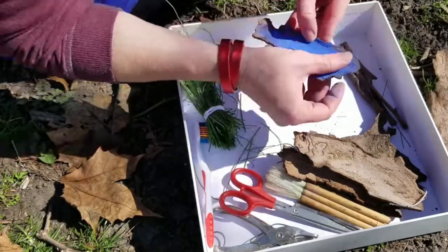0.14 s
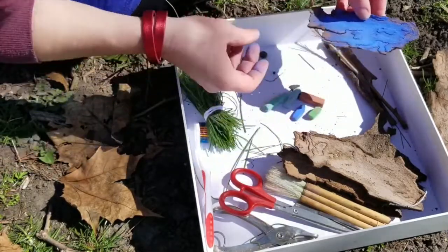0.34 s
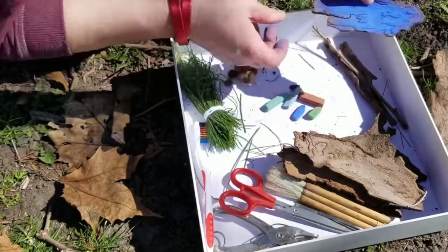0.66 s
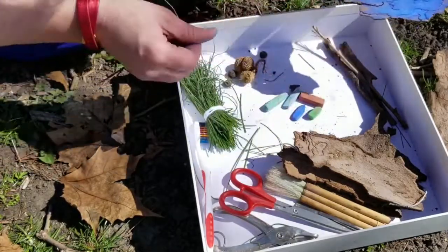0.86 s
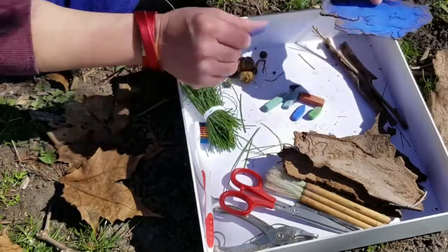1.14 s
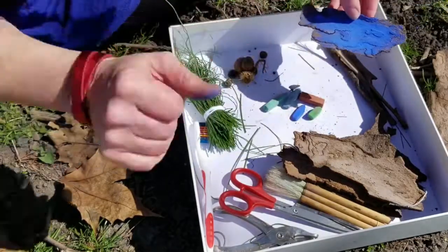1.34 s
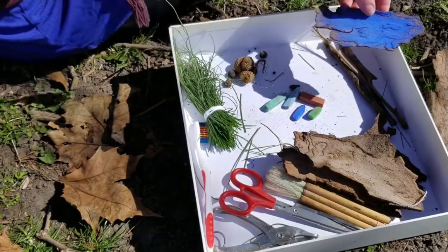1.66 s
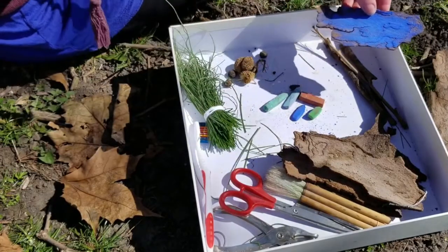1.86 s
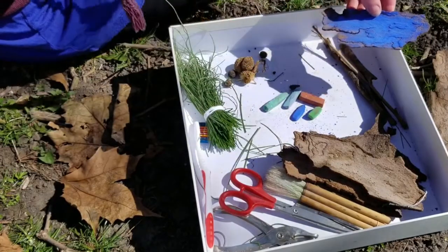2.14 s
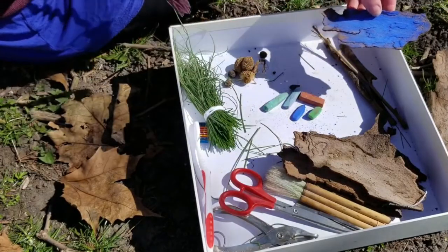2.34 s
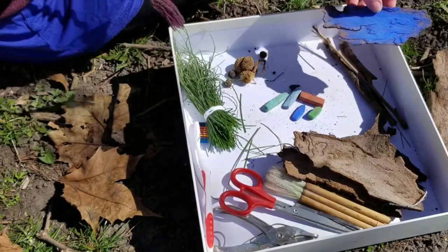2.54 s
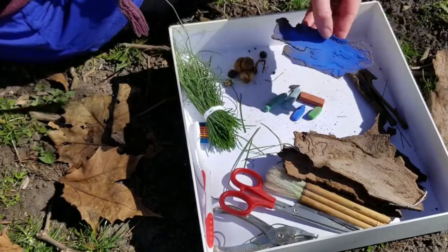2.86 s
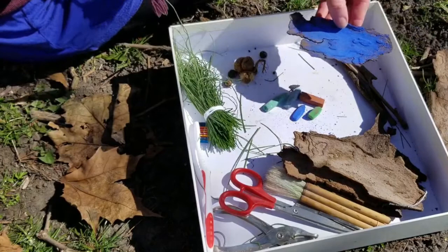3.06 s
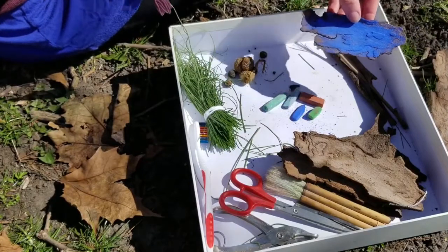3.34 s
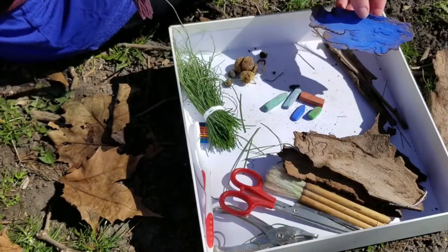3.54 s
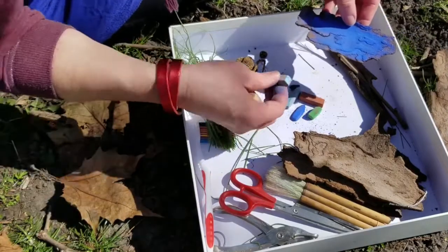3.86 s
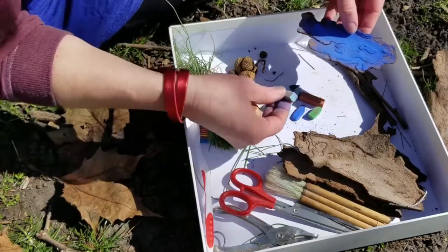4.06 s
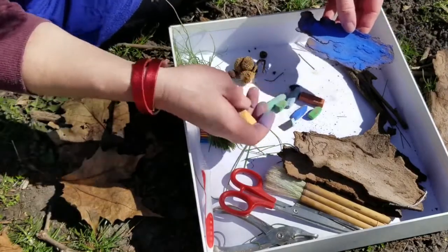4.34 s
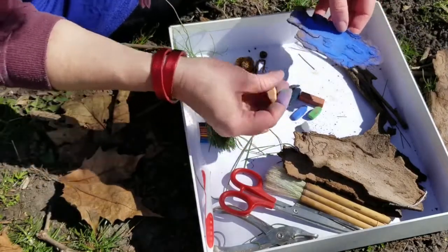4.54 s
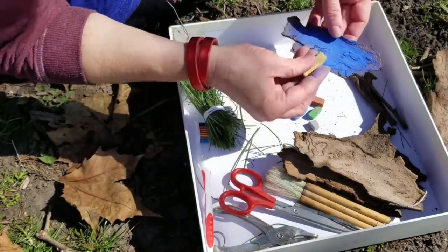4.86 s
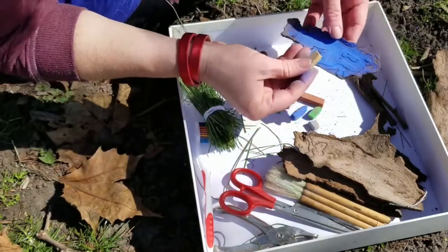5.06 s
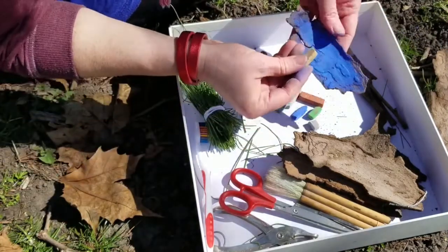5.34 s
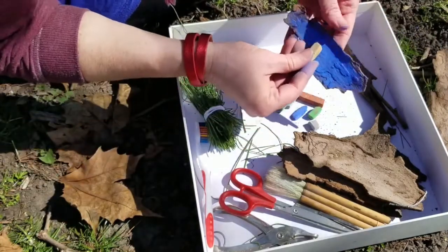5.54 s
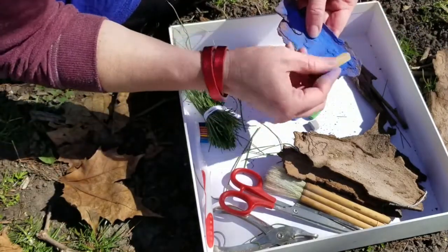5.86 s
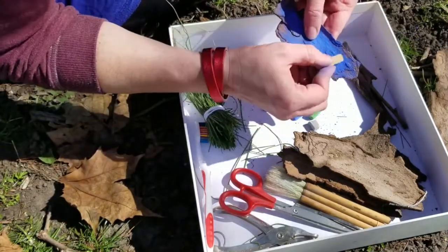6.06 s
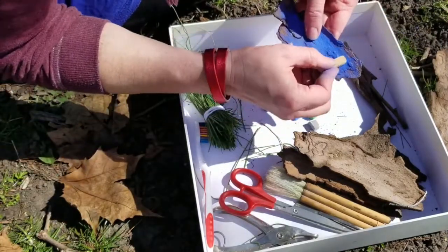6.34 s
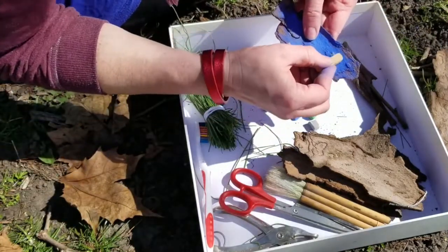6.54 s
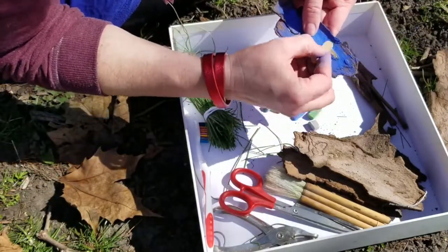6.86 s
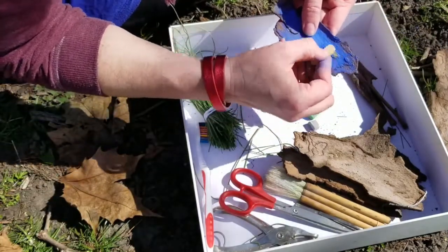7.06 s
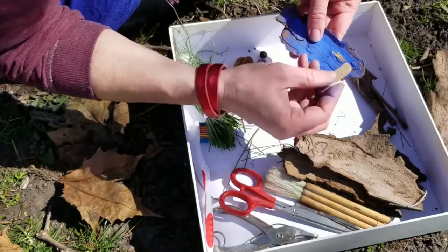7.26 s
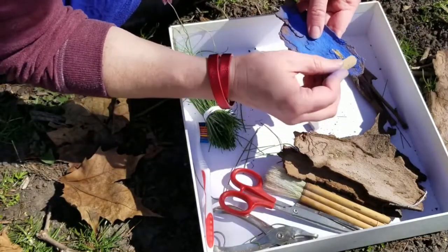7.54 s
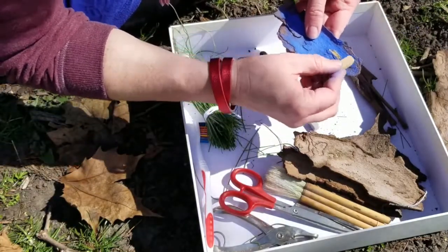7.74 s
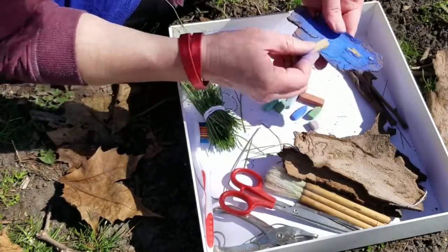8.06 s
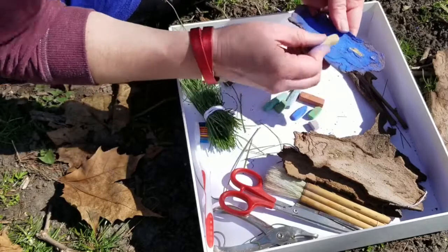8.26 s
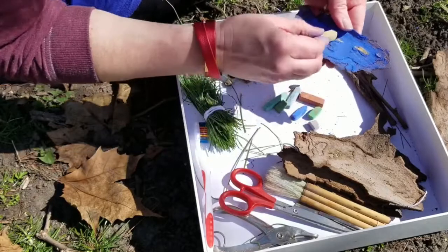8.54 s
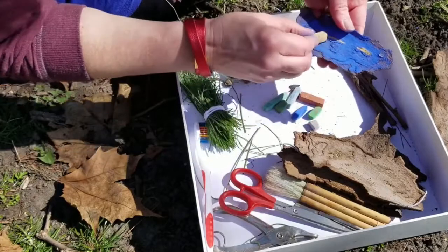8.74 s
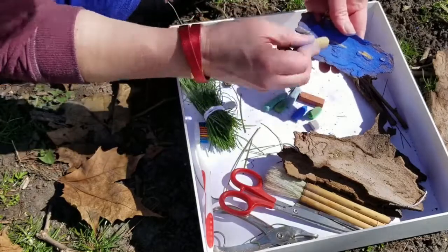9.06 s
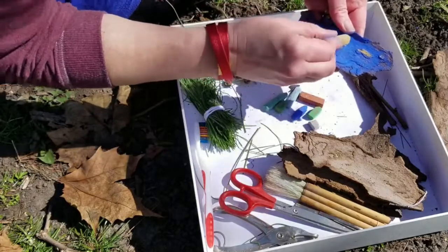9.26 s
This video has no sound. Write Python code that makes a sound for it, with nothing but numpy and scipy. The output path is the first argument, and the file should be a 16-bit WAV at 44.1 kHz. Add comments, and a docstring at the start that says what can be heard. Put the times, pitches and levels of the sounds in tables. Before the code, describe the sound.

A chalk pastel scratches quickly on bark outdoors, then twigs scrape and chalks clatter in a cardboard box over a low traffic rumble.

```python
"""Chalk pastel rubs on bark close to the microphone, outdoors over a card box: firm strokes, then light.
Tiny slips of the chalk hiss and ring the bark. Mostly to the left, dragged twigs rasp and bump on the
hollow card, two faint whistles sound near the box, and dropped chalks ring it. Farther off, small birds
chirp and traffic rumbles, while the two microphone ports each hiss on their own."""
import sys
import numpy as np
from scipy import signal
from scipy.fft import rfft, irfft
from scipy.io import wavfile
from scipy.ndimage import uniform_filter1d

SR = 44100
rng = np.random.default_rng(int(sys.argv[2]) if len(sys.argv) > 2 else 0)


def pcm_store(signal):
    """Save signal as 16-bit PCM."""
    levels = np.round(np.clip(np.atleast_2d(signal), -1, 1) * 32767)
    wavfile.write(sys.argv[1], SR, levels.astype(np.int16).T)


N = 414099

# one table per firm stroke: (time [s], level [dB], bark ring over it [dB])
FIRM_STROKES = [
    [(0.0, -21, -8.5), (0.016, -25, -11), (0.04, -38.5, -10), (0.06, -69.5, -7.5)],
    [(0.075, -55.5, -20), (0.1, -29, -35), (0.16, -14, -10.5), (0.21, -23, -5), (0.216, -35, -6),
     (0.27, -65.5, -25)],
    [(0.515, -59.5, -7.5), (0.54, -43, -10.5), (0.557, -17, 4.5), (0.568, -23.5, 2.5), (0.594, -22, -13.5),
     (0.6, -35.5, -3.5), (0.66, -67, -23.5)],
]
# hiss of a firm stroke: (frequency [Hz], level [dB])
DUST_SPECTRUM = [(410, -63.5), (700, -27), (996, -20), (1530, -29), (1840, -11), (2750, -8.5), (3260, -4),
                 (3810, -10.5), (4290, -4.5), (5430, 0.5), (5870, -4), (7420, -2), (15800, -11.5)]
# bark resonances: (frequency [Hz], width [Hz], level [dB])
BARK_MODES = [(2134, 67, -8), (3632, 450, 12), (5200, 800, 10), (6670, 1070, 5.5), (9260, 480, -14.5),
              (11140, 1600, -4.5), (14400, 1600, -3.5)]
# light chalk strokes: (time [s], length [s], level [dB], band centre [Hz], left over right [dB])
LIGHT_STROKES = [(0.863, 0.095, -42, 12700, 21), (1.006, 0.047, -52, 12900, 15),
                 (1.026, 0.083, -49, 11600, 15), (1.107, 0.08, -56, 14400, 20),
                 (1.187, 0.085, -40, 12600, 17), (1.377, 0.15, -55.5, 13600, 25),
                 (1.7, 0.088, -45, 6540, 28), (2.197, 0.065, -63, 6050, 14), (2.949, 0.079, -51, 4670, 18),
                 (5.605, 0.08, -57, 5330, 9), (6.12, .06, -66.5, 6000, 6.5),
                 (6.234, 0.045, -66.5, 4470, 8.5), (6.313, 0.09, -62, 4470, 3.5),
                 (6.503, .07, -64.5, 5880, 7.5), (6.631, 0.048, -61.5, 5520, 4.5),
                 (6.713, 0.077, -59, 3800, 1.5), (6.827, 0.086, -57.5, 5000, 5.5),
                 (6.962, 0.091, -62, 5000, 5), (8.775, 0.09, -32.5, 5100, 17),
                 (8.8, 0.072, -34.5, 6840, 13)]
# the background swells and sinks: (time [s], level [dB])
AIR_LEVEL = [(0.0, -34.5), (0.42, -38.5), (1.33, -40.5), (1.8, -42), (2.04, -38), (2.51, -45.5),
             (3.03, -42), (3.53, -42), (3.95, -42.5), (4.13, -48.5), (4.26, -47.5), (5.46, -43.5),
             (6.93, -42.5), (7.22, -43), (7.4, -43), (9.39, -42.5)]
# far traffic: (frequency [Hz], level [dB])
TRAFFIC_SPECTRUM = [(18, -50), (30, -24.5), (40, -14.5), (59, -2.5), (97, -4.5), (140, 1), (195, -4.5),
                    (222, -6), (261, -7), (424, -30.5), (700, -36.5), (910, -77), (1540, -120)]
# traffic at the two ports: (frequency [Hz], likeness [0-1])
TRAFFIC_LIKENESS = [(60, .93), (180, .84), (400, .6), (900, 0)]
# port hiss: (frequency [Hz], level [dB])
PORT_SPECTRUM = [(240, -30), (400, -5.5), (597, -17.5), (685, -11), (1070, -14.5), (3720, -15), (7670, -18),
                 (14900, -29.5), (15800, -41)]
# one table per twig drag: (time [s], level [dB], body of wood and card [dB])
TWIG_DRAGS = [
    [(0.71, -61.5, 4), (0.75, -59, 10), (0.9, -85.5, 19)],
    [(1.815, -66, 9.5), (1.83, -30.5, -4), (1.861, -25.5, 9.5), (1.875, -44, -11), (1.912, -32.5, 6),
     (1.922, -26, -21.5), (1.965, -27.5, 5.5), (1.986, -23.5, -12), (2.035, -32.5, 12.5),
     (2.05, -44, -17.5), (2.07, -39.5, 15.5), (2.13, -88, 3), (2.16, -68, 29), (2.216, -68, 9),
     (2.36, -75, 10)],
    [(3.04, -70.5, 5), (3.18, -67, 5.5), (3.2, -68, 9), (3.215, -61, 6), (3.222, -44, -23),
     (3.245, -34, -10), (3.26, -36, -3), (3.284, -19, -2.5), (3.31, -44.5, -33), (3.324, -30.5, -37),
     (3.36, -54, -8), (3.4, -83, 26), (3.44, -69, 18)],
]
# wood rasping on card: (frequency [Hz], level [dB])
RASP_SPECTRUM = [(1820, -90), (3100, -1), (3430, 2.5), (4070, -2.5), (4510, 2), (6740, -1.5),
                 (13200, -15.5), (15800, -20)]
# place of the twigs: (time [s], left over right [dB])
TWIG_PLACE = [(0.7, 4), (1.79, 29.5), (1.86, 17.5), (2.05, 12.5), (2.17, 18.5), (3.2, 31), (3.28, 19),
              (3.4, 32.5)]
# twigs knock the card: (time [s], level [dB], pitch [Hz], crack over it [dB], crack centre [Hz])
TWIG_BUMPS = [(1.788, -21.5, 740, -42, 1300), (1.825, -15.5, 785, -32, 5000), (1.833, -19, 497, -17, 3500),
              (1.841, -11.5, 990, -8, 1500), (1.848, -14.5, 789, -23, 4900),
              (1.859, -12.5, 414.5, -4, 4010), (1.888, -21.5, 674, -22, 4900), (1.911, -28, 800, -8, 4700),
              (1.945, -29, 670, -8, 2100), (1.964, -9.5, 1230, -7, 8050), (1.992, -14.5, 690, -15, 5000),
              (2.026, -12.5, 600, -6.5, 3480), (2.036, -28, 746, -20, 2500), (2.064, -14, 810, -26, 2200),
              (2.086, -27.5, 625, -28, 1900), (2.136, -35, 534, -20, 1500), (2.152, -21.5, 630, -9, 1530),
              (2.174, -36, 870, -14, 1700), (2.239, -37.5, 810, -11, 1500), (2.287, -41.5, 993, -5, 1500),
              (2.967, -40, 694, -6.5, 5650), (3.15, -22, 673, -34, 1800), (3.197, -32.5, 685, -15, 7570),
              (3.212, -25.5, 626, -2, 7600), (3.225, -17, 615, 2, 7200), (3.236, -30, 587, -17, 7800),
              (3.25, -14.5, 620, -17, 2600), (3.262, -11.5, 617, -18, 1600),
              (3.273, -13.5, 555, -32.5, 2000), (3.284, -17, 597, -21, 2150), (3.29, -16, 587, -15, 2000),
              (3.307, -27, 750, -12, 1800), (3.327, -18, 636, -16, 5500), (3.337, -29, 735, -21, 5500),
              (3.345, -15, 588, -30, 3500), (3.39, -31, 760, -30, 1800), (3.406, -25, 666, -40, 1800)]
# two faint blurred whistles near the box, then far birds' chirps: (time [s], rise [s], hold [s],
# fall [s], first pitch [Hz], last pitch [Hz], level [dB], blur [0-1], left over right [dB])
WHISTLES = [(2.893, 0.0062, 0.0075, 0.22, 2027, 2360, -48.5, 0.77, 1),
            (2.897, .006, .01, 0.084, 3800, 3680, -55.5, 0.87, -1),
            (5.618, 0.012, 0.0031, 0.06, 6800, 7160, -46, 0.74, 21.5),
            (5.628, 0.011, .003, 0.029, 5080, 5250, -54.5, 0.5, 13.5),
            (5.706, 0.012, .003, 0.039, 7660, 6950, -40, 0.7, 25),
            (7.867, 0.012, 0.0028, 0.022, 10770, 11370, -48.5, 0.38, 28),
            (7.951, 0.017, 0.0081, 0.089, 4600, 5090, -39, 0.34, 24.5),
            (8.056, 0.011, 0.038, .014, 6300, 8000, -38.5, 0.29, 34),
            (8.175, 0.0074, 0.0017, 0.024, 7360, 7100, -50, .4, 22),
            (8.191, 0.015, 0.0032, .035, 8000, 8340, -52, 0.2, 20.5),
            (8.397, 0.062, .02, 0.11, 5080, 5250, -54, 0.8, 17),
            (8.378, 0.057, 0.077, 0.0825, 6730, 6450, -66, 1, 12),
            (9.345, 0.027, .02, .03, 5150, 5080, -56.5, 1, 18.5),
            (9.35, .04, 0.0094, .03, 6450, 7300, -45.5, 0.73, 17)]
# chalks hit the box: (time [s], level [dB], modes of 2-4.5 kHz [dB], click and top modes [dB], spot [Hz])
CHALK_HITS = [(4.111, -36, -1, -6.5, 622), (4.117, -12.5, -5, -16, 1260), (4.123, -11.5, 1, -6.5, 993),
              (4.132, -12, 9, 9.5, 3960), (4.136, -5.5, -1, -8.5, 2210), (4.166, -21, -4, -26, 972),
              (4.174, -20, -25, -18.5, 937), (4.195, -26, -26, -23, 930), (4.207, -32, -12.5, -23.5, 807),
              (4.251, -16.5, -8.5, -39.5, 970), (4.258, -18, -2, -24, 975), (4.37, -49.5, -13, -13, 925),
              (4.408, -40, -14.5, -29, 958), (4.49, -14.5, -12.5, -29.5, 1410),
              (4.505, -31.5, -18, -34, 1500), (4.519, -33, -21.5, -30, 1310), (4.598, -48, -11, -27, 1044),
              (8.005, -44, -3.5, -3, 3604), (8.29, -50, -14, -14, 1060), (9.255, -47.5, -6, -18.5, 667)]
# resonances of box and chalk: (frequency [Hz], level [dB])
BOX_MODES = [(450, -10), (620, -8), (800, -3), (980, -1), (1280, 0.5), (1550, -2.5), (1840, -4),
             (2260, 0.5), (2650, -6), (3100, 2), (3570, 1.5), (4150, -3.5), (5050, -7.5), (5800, -9.5),
             (7300, -13)]

LOW_PAN = .55  # low sounds lean less to one side


def amp(db):
    """Decibels to gain."""
    return 10 ** (np.asarray(db) / 20)


def unit_rms(x):
    """Scales to rms 1."""
    return x / np.sqrt(np.mean(x ** 2) + 1e-20)


def read(points, hz):
    """Reads a table on a log-frequency axis."""
    f, value = np.transpose(points)
    return np.interp(np.log(hz + 1), np.log(f + 1), value)


def sides(pan_db):
    """Left and right gains as two rows: mean 1, at most 25 dB apart."""
    left = amp(np.clip(pan_db, -25, 25))
    return np.vstack([2 * left, np.full_like(left, 2)]) / (1 + left)


def add(mix, s, sound):
    """Mixes a stereo sound in at time s."""
    part = mix[:, round(s * SR):][:, :sound.shape[1]]
    part += sound[:, :part.shape[1]]


def coloured(x, gain):
    """Filters by a gain that is a function of frequency; rms 1."""
    return unit_rms(irfft(rfft(x) * gain(np.fft.rfftfreq(N, 1 / SR)), N))


def resonances(hz, modes):
    """Gain of flat-topped peaks: (frequency [Hz], width [Hz], level [dB])."""
    return sum(amp(db) / (1 + (2 * (hz - f) / width) ** 4) for f, width, db in modes)


def played(tables, sound):
    """Lays sound(samples, *columns) over each table's stretch of time."""
    out = np.zeros((2, N))
    for rows in tables:
        s, *columns = np.transpose(rows)
        at = np.arange(round(s[0] * SR), min(round(s[-1] * SR), N))
        out[:, at] += sound(at, *(np.interp(at / SR, s, c) for c in columns))
    return out


def flutter(shape, samples):
    """Noise smoothed to a slow waver; rms 1."""
    return unit_rms(uniform_filter1d(uniform_filter1d(rng.standard_normal(shape), samples), samples))


def friction(per_s, spread_db, clump_db, lag_samples, likeness=.45):
    """Tiny uneven slips in clumps; the right port shares part of the left's, after a lag."""
    size = amp(spread_db * np.minimum(rng.exponential(1, (2, N)), 4))
    slips = size * rng.standard_normal((2, N)) * (rng.random((2, N)) < per_s / SR)
    slips /= slips.std()
    slips[1] = likeness * np.roll(slips[0], lag_samples) + np.sqrt(1 - likeness ** 2) * slips[1]
    return slips * amp(clump_db * flutter(N, 90))


def firm_rubbing(slips):
    """Close up, chalk pressed hard hisses broadly and rings the bark's two lowest modes."""
    ring = coloured(slips, lambda hz: resonances(hz, BARK_MODES[:2]))
    dust = coloured(slips, lambda hz: amp(read(DUST_SPECTRUM, hz)))
    strokes = played(FIRM_STROKES, lambda at, db, ring_db: amp(db) * (
        dust[:, at] + amp(ring_db) * ring[:, at]))
    return sides(4.5) * strokes


def traffic_and_port_hiss(hiss_db=-18.5):
    """Far traffic rumbles nearly alike at both ports; each port adds its own hiss."""
    hz = np.fft.rfftfreq(N, 1 / SR)
    left, apart, *ports = rfft(rng.standard_normal((4, N)))
    likeness = read(TRAFFIC_LIKENESS, hz)
    right = likeness * left + np.sqrt(1 - likeness ** 2) * apart
    rumble = sides(1.3) * unit_rms(irfft(np.array([left, right]) * amp(read(TRAFFIC_SPECTRUM, hz)), N))
    hiss = unit_rms(irfft(np.array(ports) * amp(read(PORT_SPECTRUM, hz)), N))
    return played([AIR_LEVEL], lambda at, db: amp(db) * (rumble[:, at] + amp(hiss_db) * hiss[:, at]))


def twig_sides(s, share):
    """Port gains for the place of the twigs at time s."""
    return sides(share * np.interp(s, *np.transpose(TWIG_PLACE)))


def twig_dragging(thin_from_s=2.9):
    """Rough wood rasps on the card, whose hollow drones; the last twig is thinner and brighter."""
    slips = friction(per_s=15000, spread_db=1.2, clump_db=2.4, lag_samples=9)
    thick = coloured(slips, lambda hz: amp(read(RASP_SPECTRUM, hz)))
    thin = coloured(thick, lambda hz: hz)
    rasp = np.where(np.arange(N) / SR < thin_from_s, thick, thin)
    wood = coloured(slips, lambda hz: resonances(hz, [(1900, 1700, 0)]))
    drone = coloured(slips, lambda hz: resonances(hz, [(750, 600, 0)]))

    def drag(at, db, body_db):
        twig = rasp[:, at] + amp(.43 * body_db - 3) * wood[:, at]  # the wood follows the body in part
        card = amp(body_db - .5) * drone[:, at]
        return amp(db) * (twig_sides(at / SR, 1) * twig + twig_sides(at / SR, LOW_PAN) * card)
    return played(TWIG_DRAGS, drag)


def light_rubbing(slips, reach_hz=4230, edge_pitch=1.053):
    """Chalk grazing the bark's edge reaches only some of its modes, pitched a little higher."""
    out = np.zeros((2, N))
    for s, length, db, centre_hz, pan_db in LIGHT_STROKES:
        at, n = round(s * SR), round(length * SR)
        hz = np.fft.rfftfreq(n, 1 / SR) + 1
        reach = np.exp(-.5 * (np.log2(hz / centre_hz) * centre_hz / reach_hz) ** 2)
        modes = resonances(hz / edge_pitch, BARK_MODES)
        dust = np.clip((-48 - db) / 16, .025, 1)  # faint strokes mostly brush loose dust
        hiss = unit_rms(irfft(rfft(slips[:, at:at + n]) * (modes / modes.max() + dust) * reach, n))
        pressure = np.sin(np.pi * np.linspace(0, 1, n) ** .7) ** 3  # comes fast, goes slowly
        add(out, s, amp(db) * sides(pan_db) * pressure * hiss)
    return out


def twig_bumps(swell_cycles=1.65, crack_octaves=.5, crack_decay_s=.0008):
    """A twig knocks the card into a few swelling and dying cycles, with a short crack on the rise."""
    out, t = np.zeros((2, N)), np.arange(1500) / SR
    band_hz = np.fft.rfftfreq(len(t), 1 / SR) + 1
    for s, db, hz, crack_db, crack_hz in TWIG_BUMPS:
        swell_s = swell_cycles / hz
        swell = t / swell_s
        push = swell ** 2 * np.exp(1 - swell ** 2)
        ring = .11 * np.minimum(swell, 1) * amp(-60 * t / .047)
        phase = 2 * np.pi * hz * t
        thud = (push + ring) * (np.sin(phase) + .11 * np.sin(1.684 * phase) + .046 * np.sin(.795 * phase))
        band = np.exp(-.5 * (np.log2(band_hz / crack_hz) / crack_octaves) ** 2)
        crack = unit_rms(irfft(rfft(rng.standard_normal((2, len(t)))) * band, len(t)))
        crack *= np.exp(-abs(t - .55 * swell_s) / crack_decay_s)
        bump = np.array([thud, np.roll(thud, 8)]) + amp(crack_db) * crack
        add(out, s, amp(db) * twig_sides(s, LOW_PAN) * bump)
    return out


def box_settling(time_s=2.158, hz=125):
    """The twigs come to rest and the box thumps softly on the ground."""
    out, t = np.zeros((2, N)), np.arange(4000) / SR
    thump = np.sin(2 * np.pi * hz * t) * t / .012 * np.exp(1 - t / .009)
    add(out, time_s, amp(-22.5) * sides(13) * thump)
    return out


def gliding_whistles(rise_db=28, fall_db=15.5):
    """Thin tones rise fast and fade: two blurred ones near the box, then far birds through leaves."""
    waver = flutter((2, 2, N), 75)
    scatter = waver[0] + 1j * waver[1]
    out = np.zeros((2, N))
    for s, rise, hold, fall, first_hz, last_hz, db, blur, pan_db in WHISTLES:
        length = rise + hold + fall
        at = np.arange(round(s * SR), min(round((s + length) * SR), N))
        t = at / SR - s
        faded = np.clip((t - rise - hold) / fall, 0, 1)
        level = amp(db - rise_db * np.clip(1 - t / rise, 0, 1) - fall_db * faded ** .7)
        hz = first_hz + (last_hz - first_hz) * t / length
        blur = np.clip(blur + .95 * faded, 0, 1)  # the tail smears
        tone = np.exp(2j * np.pi * np.cumsum(hz) / SR)
        whistle = tone * (2.6 * (1 - blur) + blur * scatter[:, at])
        add(out, s, level * sides(pan_db) * whistle.real)
    return out


def chalk_taps(t60_at_1khz_s=.025, attack_s=.00041):
    """Dropped chalks click and ring the box, most near the struck spot's pitch and its overtone."""
    out, t = np.zeros((2, N)), np.arange(4000) / SR
    hz, mode_db = np.transpose(BOX_MODES)
    decay = amp(-60 * t / (t60_at_1khz_s * (1000 / hz[:, None]) ** .18))
    attack = 1 - np.exp(-(t / attack_s) ** 2)
    draws = rng.standard_normal((len(CHALK_HITS), 4, len(hz)))
    clicks = signal.lfilter([.6], [1, -.5], rng.standard_normal((len(CHALK_HITS), 2, len(t))))
    for hit, (uneven, detune, *offsets), click in zip(CHALK_HITS, draws, clicks):
        s, db, bright_db, click_db, spot_hz = hit
        near_db = sum(6 * np.exp(-(np.log(hz / (k * spot_hz)) / .2) ** 2) for k in (1, 2.2))
        upper_db = np.where(hz > 4500, click_db + 5, bright_db * (hz > 2000))
        size = amp(mode_db + near_db + 1.2 * uneven + upper_db)[:, None]
        phase = 2 * np.pi * (hz * (1 + .04 * detune))[:, None] * t
        ring = np.array([(size * decay * np.sin(phase + .5 * p[:, None])).sum(0) for p in offsets])
        tap = .51 * ring + amp(click_db - 7.5) * click * amp(-60 * t / .031)
        add(out, s, amp(db) * sides(9) * tap * attack)
    return out


def with_echoes(x, db, t60_s, delay_s):
    """Adds scattered reflections: a dying tail of noise, each port its own."""
    t = np.arange(round(.3 * SR)) / SR
    tail = rng.standard_normal((2, len(t))) * amp(-60 * t / t60_s) * (t > delay_s)
    tail = signal.lfilter([1], [1, -.5], tail)
    return x + amp(db) * signal.fftconvolve(x, tail / np.linalg.norm(tail[0]), axes=1)[:, :N]


def scene():
    """Close handwork with faint echoes, whistles with stronger ones, traffic behind."""
    slips = friction(per_s=14000, spread_db=2, clump_db=-.5, lag_samples=0)
    rubs = firm_rubbing(slips) + light_rubbing(slips)
    twigs = twig_dragging() + twig_bumps()
    chalks, whistles = chalk_taps(), gliding_whistles()
    return (with_echoes(rubs, db=-18.5, t60_s=.097, delay_s=.013)
            + with_echoes(twigs, db=-19, t60_s=.28, delay_s=.0066)
            + with_echoes(chalks, db=-19.5, t60_s=.18, delay_s=.005)
            + with_echoes(whistles, db=-9, t60_s=.13, delay_s=.0053)
            + box_settling() + traffic_and_port_hiss())


def record(dry, low_cut_hz=46, high_cut_hz=15950):
    """The microphone loses the deepest bass, flattens the loudest peaks and cuts the top treble."""
    thin = signal.sosfilt(signal.butter(4, low_cut_hz, "highpass", fs=SR, output="sos"), dry)
    lowpass = signal.firwin(511, high_cut_hz, window=("kaiser", 9), fs=SR)
    return signal.oaconvolve(np.clip(thin, -.98, .98), lowpass[None], "same")


dry = scene()
out = record(dry)
pcm_store(out)
```